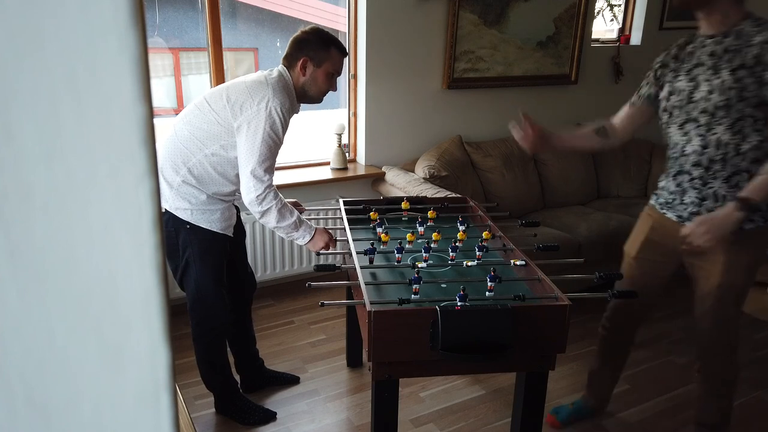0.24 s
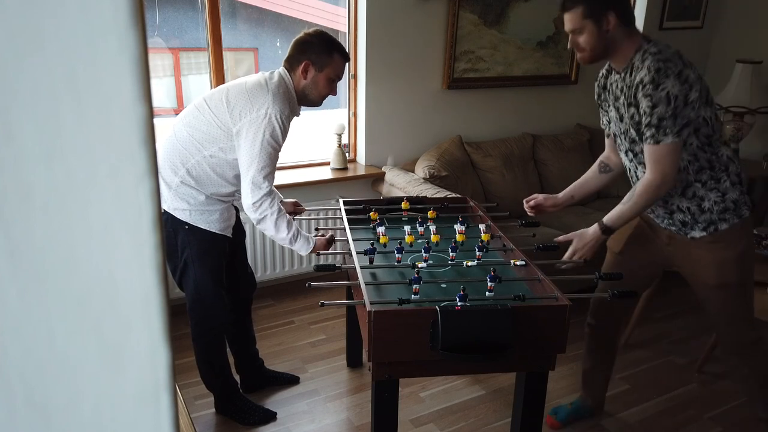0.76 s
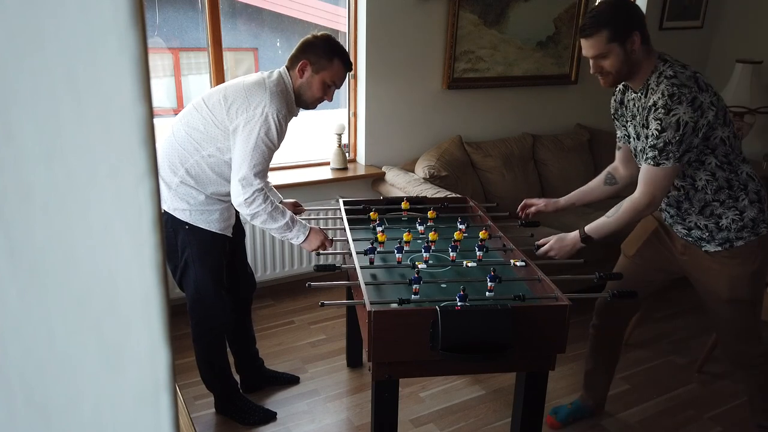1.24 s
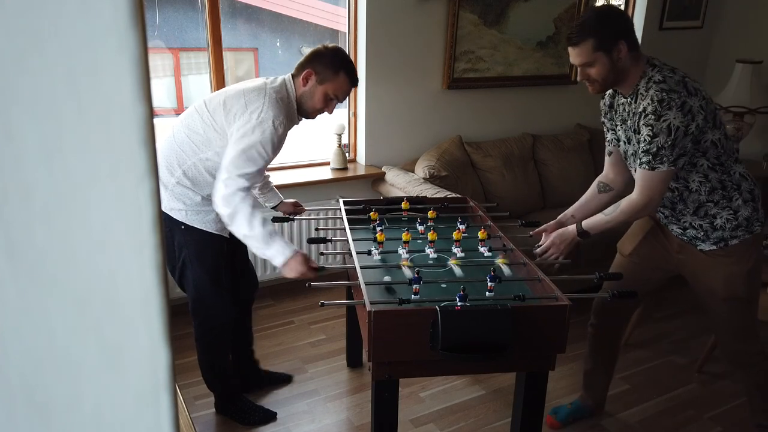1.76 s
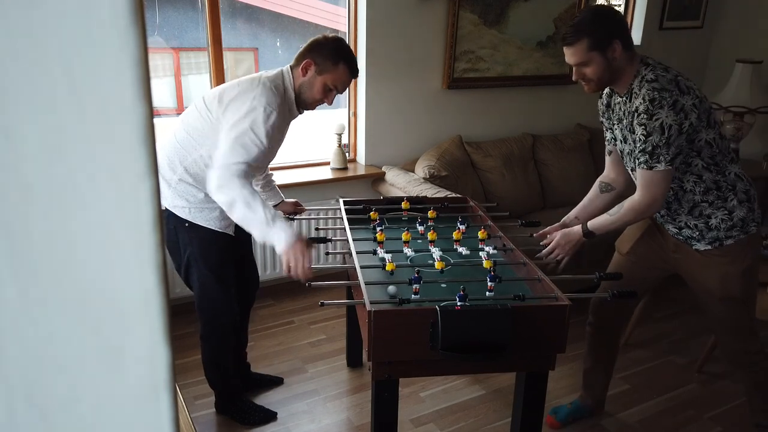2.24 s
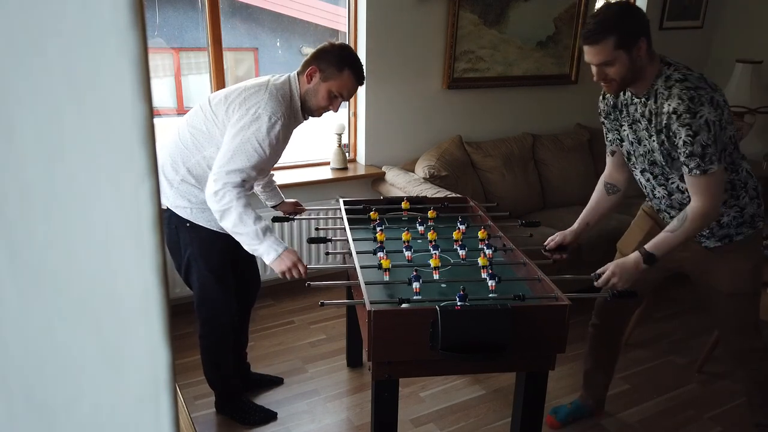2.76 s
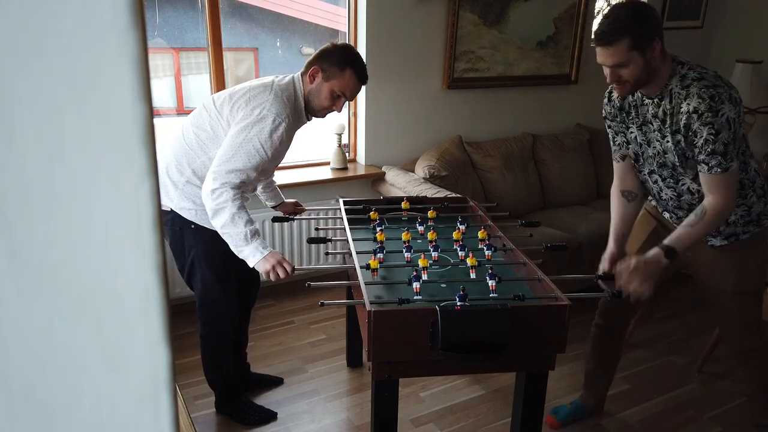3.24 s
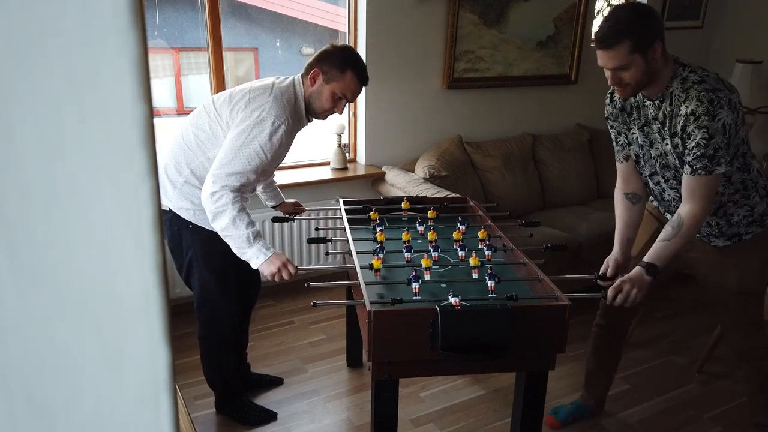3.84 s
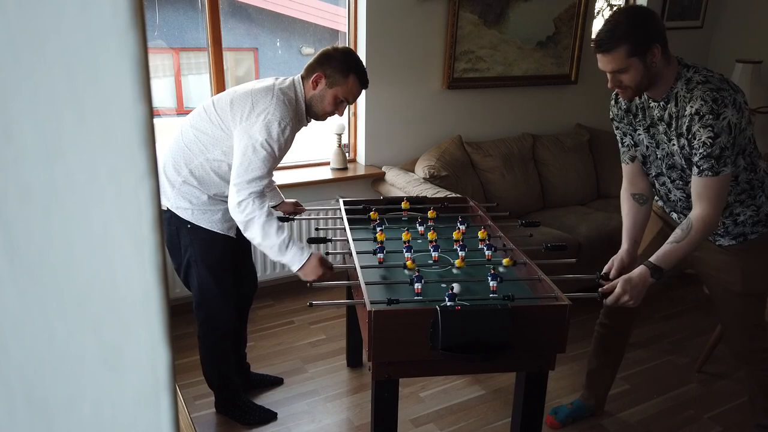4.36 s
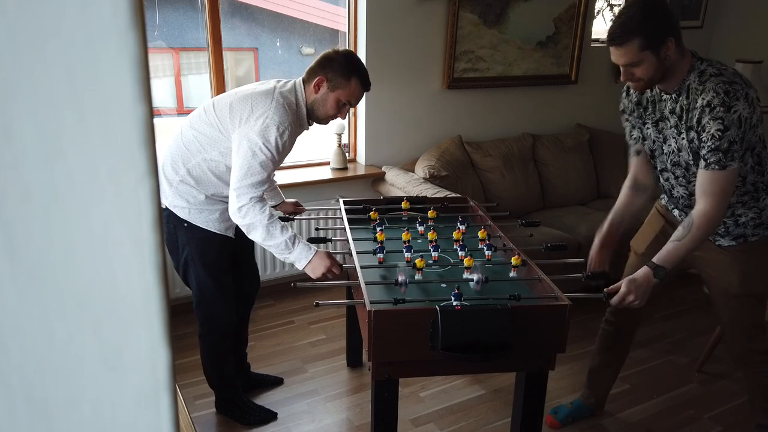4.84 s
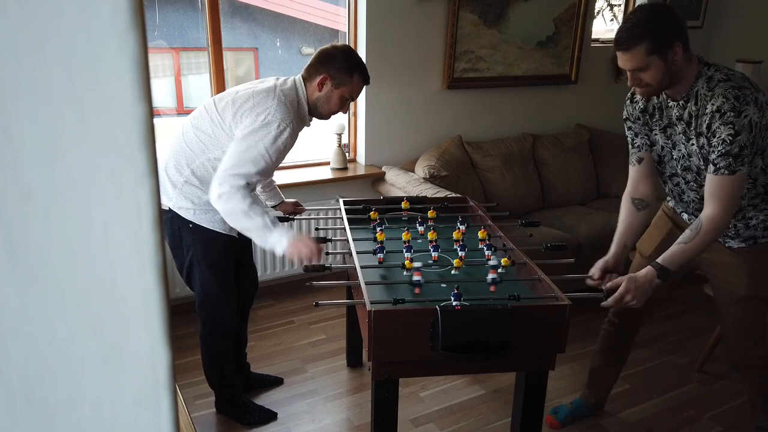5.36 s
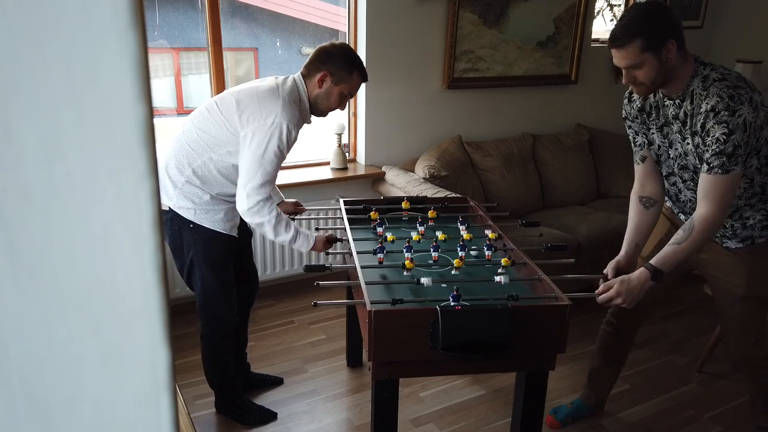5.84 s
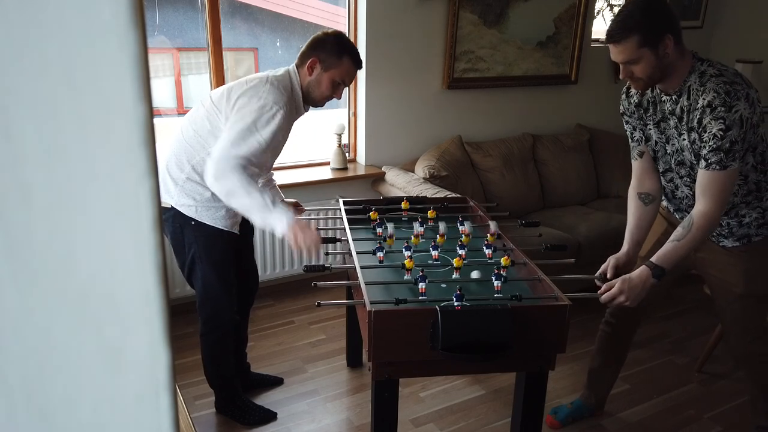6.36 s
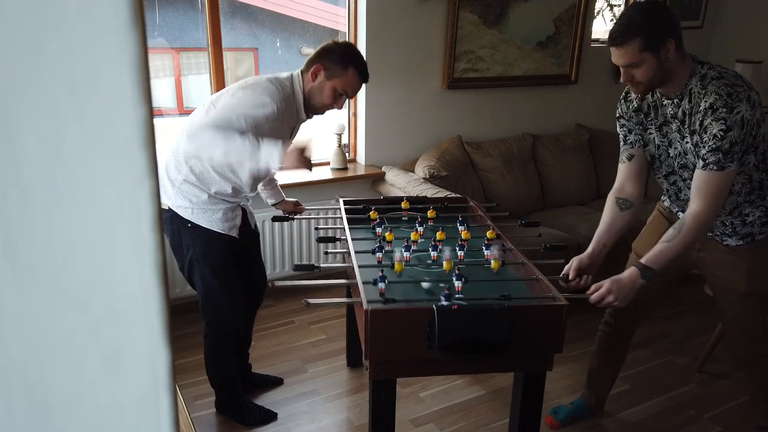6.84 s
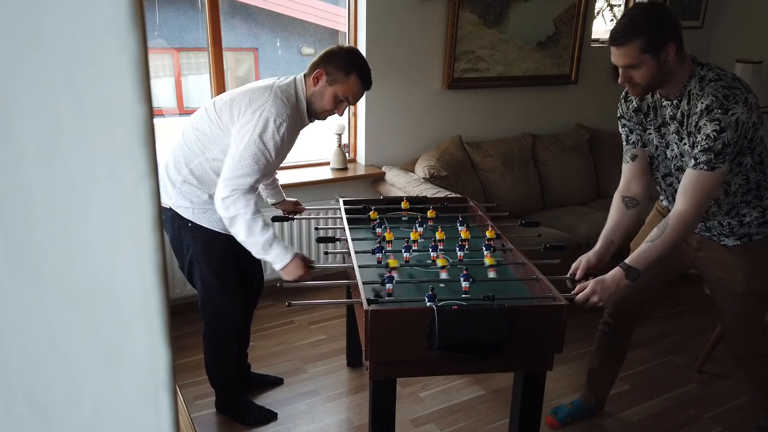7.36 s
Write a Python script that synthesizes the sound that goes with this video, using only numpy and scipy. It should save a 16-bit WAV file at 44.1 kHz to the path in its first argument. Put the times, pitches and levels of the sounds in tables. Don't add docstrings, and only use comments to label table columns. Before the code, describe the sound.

Hard plastic clacks and hollow wooden booms from a foosball table, with loose steel rods rattling, in short rallies in a furnished room.

```python
import sys
import numpy as np
from scipy import signal
from scipy.fft import rfft, irfft, next_fast_len
from scipy.io import wavfile
from scipy.ndimage import uniform_filter1d

SR = 44100
rng = np.random.default_rng(int(sys.argv[2]) if len(sys.argv) > 2 else 0)


def inscribe(sig):
    pcm = np.round(np.clip(np.atleast_2d(sig).T, -1, 1) * 32767)
    wavfile.write(sys.argv[1], SR, pcm.astype(np.int16))


def elevation(decibels):
    levels = np.asarray(decibels, float)
    return 10 ** (levels / 20)


N = 335160

# start in seconds, clack level in dB, clack pitch in Hz,
# cabinet thud minus clack in dB, rod rattle minus clack in dB.
SHOTS = [(0.939, -44.5, 2570, -16, -1), (0.949, -22.5, 2200, 6.5, -10.5),
         (1.246, -19.5, 1750, -13.5, -18.5), (2.042, -29, 1300, 8, -5), (4.089, -34, 1500, 10.5, -17),
         (4.217, -44, 2630, 3, 5), (4.885, -39.5, 1690, 6, -21), (4.958, -32.5, 1340, -0.5, -1.5),
         (5.237, -23.5, 1500, -16, -34.5), (5.908, -37.5, 2680, 6.5, -23), (6.078, -30, 2390, -4, -12.5),
         (6.162, -17.5, 1680, -2, -25), (6.611, -44, 2180, 7, -20.5), (6.844, -41, 1440, 13, -20),
         (6.906, -39.5, 1630, 14, -8.5), (6.968, -22.5, 1710, 12, -21.5)]
# start in seconds, clack level in dB, thud minus clack in dB,
# rattle minus clack in dB.
REBOUNDS = [(0.997, -25.5, 9.5, -11.5), (1.029, -30.5, 8, -8.5), (1.272, -29, -25, -12),
            (1.322, -37, 9, -13.5), (4.259, -48, 13, -9), (5.0, -36, 3, -5.5), (5.099, -41, 12.5, -29),
            (6.354, -40, 7.5, -35), (6.926, -38, 2, -32), (7.054, -28.5, 11, -9.5), (7.089, -29, 3, -14.5)]
# start in seconds, clack level in dB,
# thud minus clack in dB.
NUDGES = [(0.375, -72.5, 15), (0.669, -68, 10), (1.574, -49, 6.5), (1.76, -64, 9.5), (1.816, -50.5, 16),
          (1.936, -58.5, 20), (2.41, -64, 19), (2.434, -45, 12), (2.488, -47, 12.5), (2.64, -77.5, 29),
          (2.756, -81, 32.5), (2.799, -65, 14.5), (2.833, -48, 6.5), (2.979, -76.5, 18),
          (3.47, -79.5, 21.5), (3.498, -67.5, 19), (3.52, -60.5, 16), (3.55, -67.5, 27), (4.392, -64, 20),
          (4.54, -69.5, 25), (4.665, -54.5, 8.5), (4.707, -50.5, 13), (4.727, -59.5, 14), (5.516, -64, 8),
          (5.625, -69.5, 26), (5.668, -81, 20), (5.723, -58.5, 21), (5.799, -62.5, 26.5),
          (6.027, -51.5, 6.5), (7.524, -64.5, 19.5)]


def all_blows():
    blow_list = [(*row, 0.0044) for row in SHOTS]
    for s, db, thud_db, rattle_db in REBOUNDS:
        blow_list.append((s, db, 1500, thud_db, rattle_db, 0.0058))
    for s, db, thud_db in NUDGES:
        pitch_hz = 1110 + 5.5 * (db + 60.5)
        rattle_db = -23.5 - 0.45 * (db + 61.5)
        blow_list.append((s, db, pitch_hz, thud_db, rattle_db, 0.005))
    return sorted(blow_list)


# ratio to the clack pitch, level in dB, t60 in seconds.
CLACK = [(.55, -10.5, 0.0045), (.75, 5.5, 0.0028), (1.0, 4, 0.0051), (1.3, 1, 0.0027), (1.65, -7.5, 0.0043)]


def clack_tone(contact, hz, ring_share=0.5, edge=2.075):
    tone = 0
    for ratio, db, t60 in CLACK:
        level = elevation(db + rng.standard_normal())
        tone = tone + level * ring(contact, hz * ratio, ring_share * t60)
    band = signal.butter(3, [hz / 3.4, hz * edge], "band", fs=SR, output="sos")
    return signal.sosfilt(band, tone)


def blows(bounce=0.32, hard_s=0.0061, rattle_stretch=2.1, push_s=0.00031, first_push=0.35):
    clack, shake, push = np.zeros((2, N)), np.zeros(N), np.zeros((len(CABINET), N))
    t = np.arange(SR // 6) / SR
    for k, (s, db, hz, thud_db, rattle_db, length) in enumerate(all_blows()):
        swell = t / length
        contact = bounce * grit(len(t), 2.8) * swell * np.exp(-2 * swell)
        contact[0] = np.exp(-(length / hard_s) ** 2)
        add(clack[k % 2], s, energy(clack_tone(contact, hz), db + 23))

        swell = swell / rattle_stretch
        jolt = grit(len(t), 0.83) * swell * np.exp(-2 * swell)
        add(shake, s, energy(jolt, db + rattle_db + 26.5))

        contact[0] *= first_push
        soft = signal.lfilter([1], [1, -np.exp(-1 / (push_s * SR))], contact)
        place_db = 2 * rng.standard_normal((len(CABINET), 1))
        add(push, s, elevation(2 * place_db) * energy(soft, db + thud_db - 19.5))
    return clack, shake, push


# frequency in Hz, level in dB, t60 in seconds.
CABINET = [(138, -10.5, 0.1), (150, -13.5, 0.091), (219.5, -4, 0.058), (242.7, -1.5, 0.093),
           (283, -9, 0.097), (374.6, -7, 0.093), (426, 0.5, 0.052), (464, -7, .05), (463, -7.5, 0.05),
           (563, -3, 0.049), (553, -8, 0.05), (703, -10, 0.021), (813, -9, 0.035), (1000, -9, 0.016),
           (1200, -7, 0.0098), (1500, -15, .01)]


def cabinet(force):
    box = sum(elevation(db) * ring(f, hz, t60) for f, (hz, db, t60) in zip(force, CABINET))
    return signal.sosfilt(signal.butter(4, 122, "high", fs=SR, output="sos"), box)


# start in seconds, length in seconds, level in dB, brightness in dB per octave.
ROLLS = [(0.0, 0.026, -67, 6), (0.434, 0.36, -74, -6), (1.066, 0.14, -38.5, 4.5), (1.3, .24, -48.5, 2),
         (1.552, 0.094, -44.5, -5.5), (1.726, 0.26, -45, -4.5), (2.046, 0.0088, -15, 3.5),
         (2.098, 0.066, -44, 3), (2.379, 0.15, -44.5, -1), (2.833, 0.12, -45.5, -3),
         (3.127, .2, -64.5, -1.5), (4.1, 0.161, -39, 3.5), (4.384, 0.096, -53, -16),
         (4.525, 0.32, -43.5, -9), (4.699, 0.03, -37.5, -14), (4.881, 0.027, -35, -8),
         (4.975, .14, -33, 13), (5.171, 0.26, -37.5, -0.5), (5.451, .33, -53, -11),
         (5.908, 0.045, -32.5, -11), (6.079, .09, -33.5, 4), (6.187, .09, -24.5, -4), (6.298, .16, -30, -3),
         (6.49, 0.53, -34, -7.5), (6.952, 0.07, -23.5, 3), (7.063, .07, -25.5, 4.5),
         (7.153, 0.11, -34.5, 2.5), (7.393, 0.191, -52, -10.5)]


def rolling():
    level_db, row = spells(ROLLS, rise=900, sag=13.5, fall=402, rest_db=-81)
    bright_db = uniform_filter1d(np.array(ROLLS)[row, 3], SR // 30)
    bright_db = np.clip(bright_db, -12, 6)
    bumps = grit(N, 1.9) * elevation(level_db - 38 + 2 * walk(30))
    octaves = np.log2(np.maximum(np.array(CABINET)[:, 0], 200) / 300)
    return np.array([bumps * elevation(bright_db * k + 3.96 * walk(8.1)) for k in octaves])


# start in seconds, length in seconds, level in dB.
SLIDES = [(0.0, 0.055, -72.5), (.4, 1, -71.5), (.942, .01, -51), (1.07, .03, -54.5), (1.22, 0.23, -52.5),
          (1.9, .12, -65), (2.04, .015, -42), (2.12, 0.059, -55.5), (2.43, 0.05, -58.5),
          (3.14, 0.16, -77.5), (3.5, 0.52, -89), (4.09, 0.12, -50.5), (4.5, 0.27, -75), (4.89, 0.073, -54),
          (5.03, .04, -44.5), (5.2, 0.13, -61), (5.72, 0.11, -77.5), (5.89, 0.018, -64),
          (6.065, 0.024, -50.5), (6.14, .06, -43), (6.26, .1, -58.5), (6.6, 0.087, -69), (6.86, 0.083, -54),
          (7.0, .015, -31.5), (7.07, .11, -43)]


def sliding():
    level_db = spells(SLIDES, rise=333.5, sag=8, fall=303, rest_db=-88.5)[0]
    return grit(N, 0.97) * elevation(level_db - 12 + 4.5 * walk(30))


# frequency in Hz, level in dB per Hz.
RATTLE = [(1470, -24), (2500, -2), (2870, -6.5), (3130, -3.5), (3410, -6.5), (5060, -8.5), (7230, -11.5),
          (10100, -7), (11600, -15), (14900, -18), (16000, -46.5)]
# frequency in Hz, level in dB, t60 in seconds.
RODS = [(3400, -40.5, 0.04), (5370, -42.5, 0.13), (8500, -39.5, 0.031), (9700, -40.5, 0.037)]


def rods(shake, slide):
    chatter = colour(shake + slide, RATTLE) / np.std(colour(rng.standard_normal(SR), RATTLE))
    return chatter + sum(elevation(db) * ring(shake, hz, t60) for hz, db, t60 in RODS)


# delay in seconds, level in dB.
ECHOES = [
    (.0042, 1),
    (.012, -3),
    (.022, -12.5),
    (.028, -3.5),
]
# frequency in Hz, t60 in seconds, level in dB.
ROOM = [(98.8, 0.46, -8.5), (493, 0.33, 0), (2000, 0.4, -1.47), (5560, 0.42, 0.5), (12400, 0.17, 0)]


def late_tail(t, tail_db=3, rise_s=0.0093):
    hz, t60, wet_db = np.transpose(ROOM)
    tail = 0
    for lo in 44 * 2. ** np.arange(9):
        band = signal.butter(2, [lo, min(2 * lo, 21000)], "band", fs=SR, output="sos")
        fade_s = np.interp(np.log(1.4 * lo), np.log(hz), t60)
        db = np.interp(np.log(1.4 * lo), np.log(hz), wet_db)
        tail = tail + elevation(db - 60 * t / fade_s) * signal.sosfilt(band, rng.standard_normal((2, len(t))))
    tail = tail * (1 - np.exp(-t / rise_s))
    return elevation(tail_db) * tail / np.sqrt(np.sum(tail[0] ** 2))


def room(x, direct_db=-0.5):
    t = np.arange(int(.7 * SR)) / SR
    tail = late_tail(t)
    early = np.zeros(len(t))
    early[0] = elevation(direct_db)
    for s, db in ECHOES:
        scatter = rng.standard_normal(SR // 500) * np.exp(-t[:SR // 500] / .0006)
        add(early, s * (1 + .05 * rng.standard_normal()), energy(scatter, direct_db + db))
    crossing = 1.14 * np.convolve(early, [1, 0, -1])[1:len(t) + 1]
    answer = tail + [early, crossing]
    return signal.fftconvolve(x[None], answer, axes=1)[:, :N]


# start in seconds, length in seconds, level in dB.
STEPS = [(0.0, 0.044, -59), (.38, .05, -53), (.92, 0.051, -56.5), (1.02, .1, -45.5), (1.28, .03, -52.5),
         (1.35, 0.1, -54), (1.78, .03, -54), (2.05, .12, -43.5), (2.24, .02, -46.5), (2.34, .22, -56),
         (2.62, 0.146, -55.5), (2.85, 0.12, -59.5), (4.12, 0.16, -57.5), (4.35, 0.24, -59.5),
         (4.92, .15, -49), (5.09, 0.21, -48), (5.4, 0.55, -57), (5.9, .12, -45), (6.175, .03, -32),
         (6.25, .1, -39), (6.4, 0.41, -53.5), (6.93, 0.03, -42), (6.985, 0.031, -27), (7.09, .02, -33),
         (7.13, .18, -44), (7.35, .22, -52.5)]


def floorboards():
    level_db = spells(STEPS, rise=351.5, sag=12, fall=301, rest_db=-72)[0]
    tremble_hz_db = [(12, -29), (25, -4.5), (55, 0), (90, -14.5), (200, -61.0)]
    return unit(colour(rng.standard_normal((2, N)), tremble_hz_db)) * elevation(level_db)


# frequency in Hz, level in dB per Hz.
AIR = [(12, -30.5), (20, -8), (104, -7), (177, 1), (301, -7), (557, -17), (677, -22.5), (1290, -14.5),
       (6340, -33.5), (9380, -28.5), (12400, -40.5), (13500, -55.5), (16000, -49.5)]


def still_air():
    return unit(colour(rng.standard_normal((2, N)), AIR)) * elevation(-69.5)


# frequency in Hz, side minus mid level in dB.
SIDE_SHARE = [(60, -23), (110, -47.5), (200, -42), (380, -55.5), (700, -16), (1290, -16.5), (2380, -8),
              (4400, -3.5), (8120, -4), (15000, -4.5)]


def ports(mid, side):
    side = colour(side, SIDE_SHARE)
    return np.array([mid + side, mid - side])


def spells(table, rise, sag, fall, rest_db):
    t = np.arange(0, N, 32) / SR
    start, length, db = np.array(table).T[:3, :, None]
    each = db - rise * np.maximum(start - t, 0)
    each = each - sag * np.clip(t - start, 0, length)
    each = each - fall * np.maximum(t - start - length, 0)
    total = 10 * np.log10(np.sum(elevation(2 * each), axis=0) + elevation(2 * rest_db))
    return np.interp(np.arange(N) / SR, t, total), np.repeat(np.argmax(each, axis=0), 32)[:N]


def ring(x, hz, t60):
    pole = np.exp(2j * np.pi * hz / SR - np.log(1000) / (t60 * SR))
    return signal.lfilter([1], [1, -pole], x).imag


def grit(size, spread_db):
    return unit(rng.standard_normal(size) * elevation(spread_db * rng.exponential(size=size)))


def walk(rate):
    k = int(SR / rate)
    return uniform_filter1d(np.repeat(rng.standard_normal(N // k + 1), k)[:N], k)


def colour(x, table):
    hz, db = np.transpose(table)
    size = next_fast_len(x.shape[-1])
    f = np.maximum(np.arange(size // 2 + 1) * SR / size, 1)
    gain = elevation(np.interp(np.log(f), np.log(hz), db))
    return irfft(rfft(x, size) * gain, size)[..., :x.shape[-1]]


def unit(x):
    return x / np.sqrt(np.mean(x ** 2))


def energy(x, db):
    return x * elevation(db) / np.sqrt(np.sum(x ** 2))


def add(track, at_s, sound):
    i = int(at_s * SR)
    track[..., i:i + sound.shape[-1]] += sound[..., :N - i]


def scene():
    clack, shake, push = blows()
    box = cabinet(push + rolling())
    steel = rods(shake, sliding())
    turn = np.pi * 0.7988 * np.arange(N) / SR
    mid, side = room(clack[0] + steel) + room(clack[1] + box * np.cos(turn)) + room(box * np.sin(turn))
    boards, air = floorboards(), still_air()
    return ports(mid + boards[0] + air[0], side + elevation(-8) * boards[1] + air[1])


def low_pass(x):
    return signal.sosfilt(signal.butter(12, 16100, fs=SR, output="sos"), x)


def record(dry):
    mix = np.tanh(1.208 * dry) / 1.188
    return low_pass(mix)


dry = scene()
out = record(dry)
inscribe(out)
```